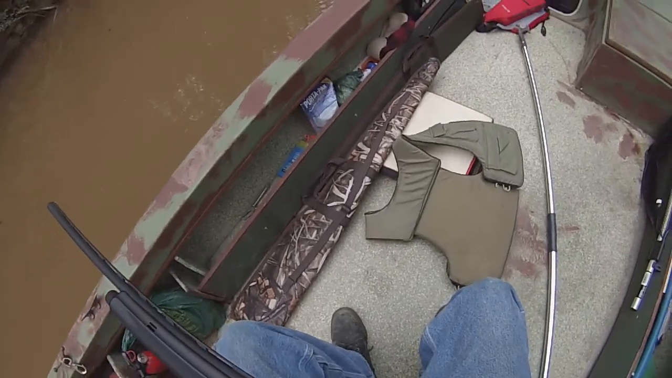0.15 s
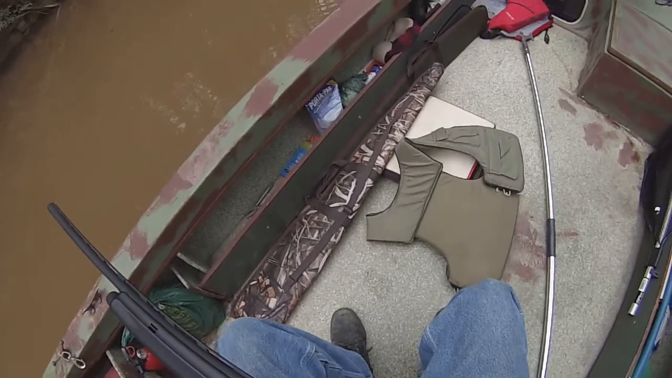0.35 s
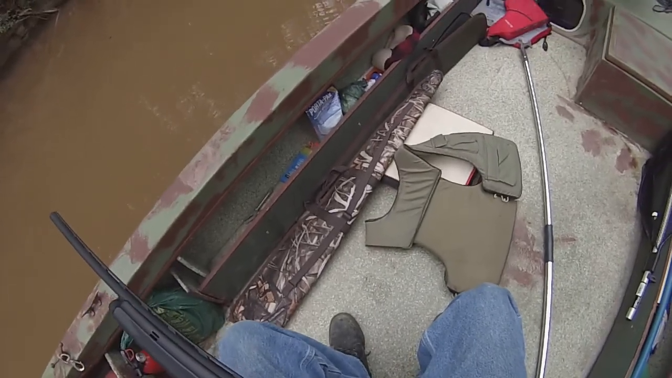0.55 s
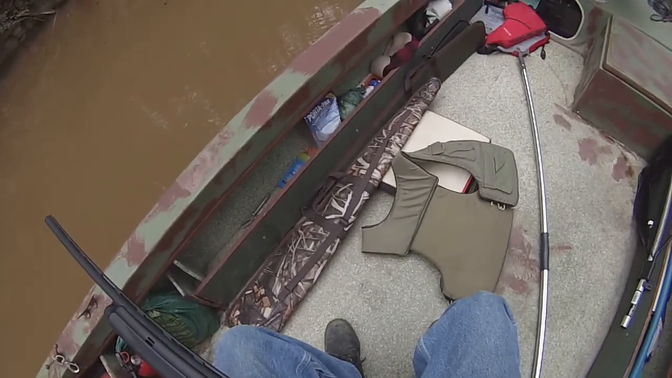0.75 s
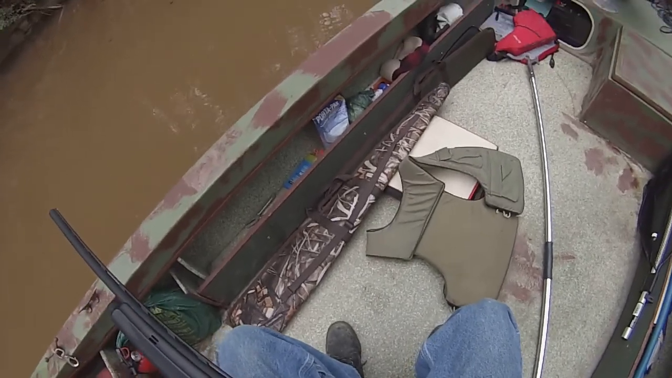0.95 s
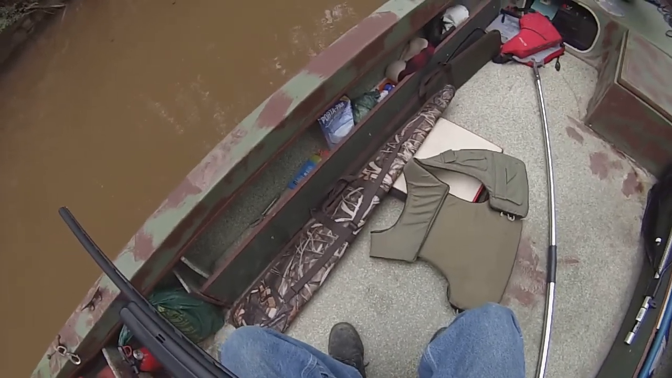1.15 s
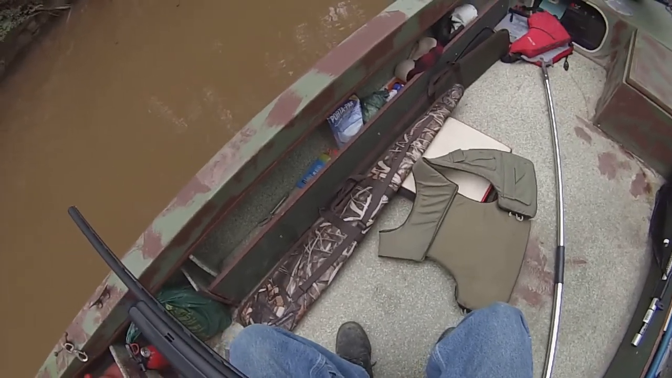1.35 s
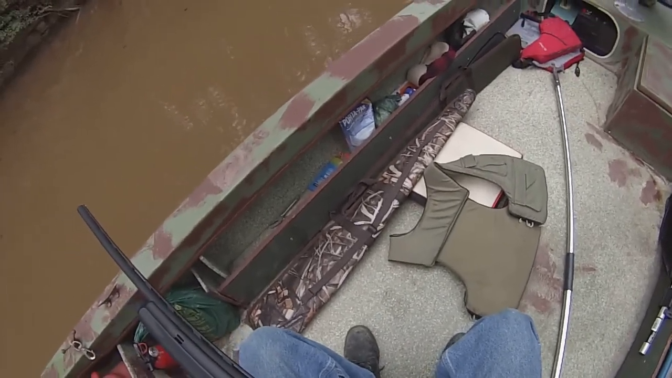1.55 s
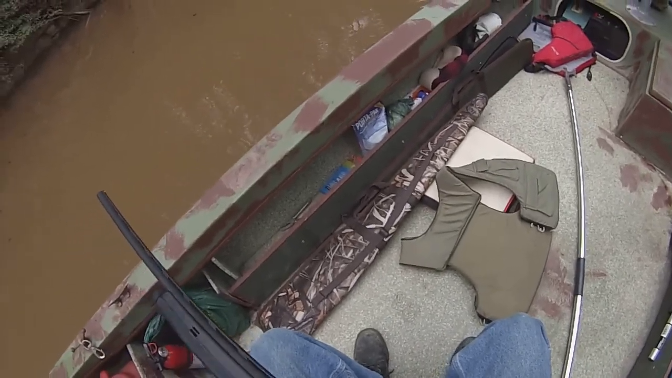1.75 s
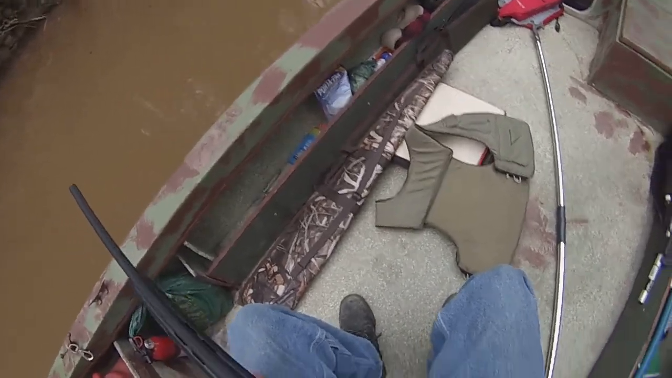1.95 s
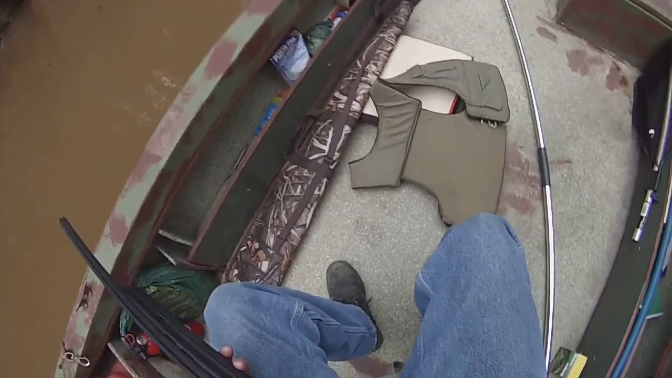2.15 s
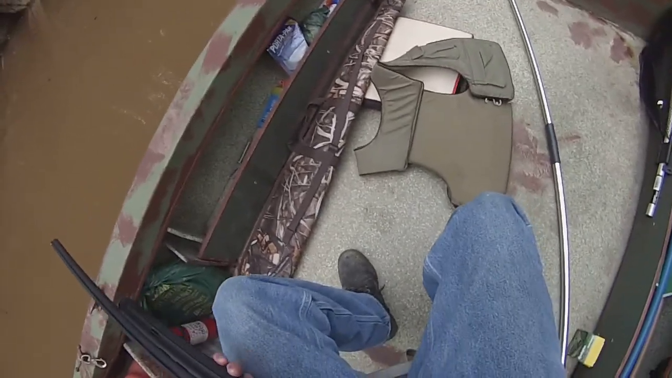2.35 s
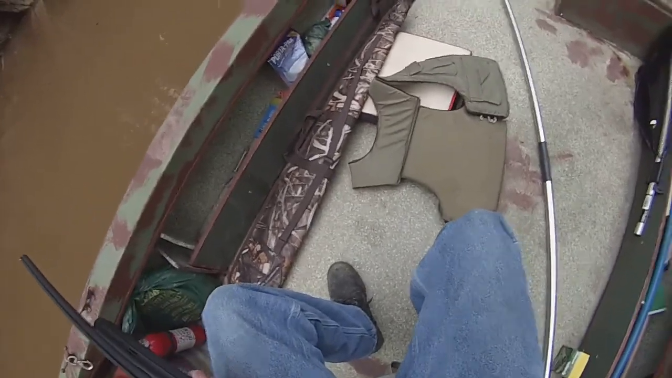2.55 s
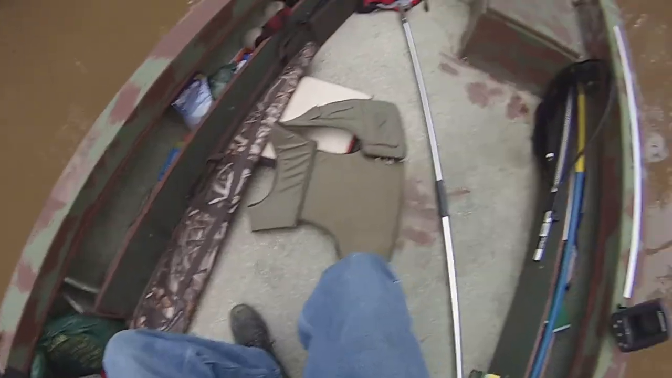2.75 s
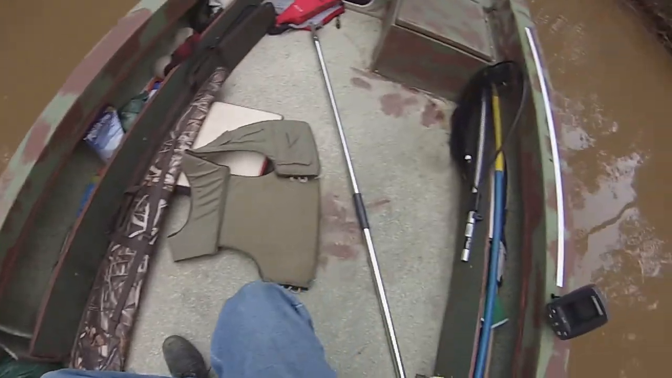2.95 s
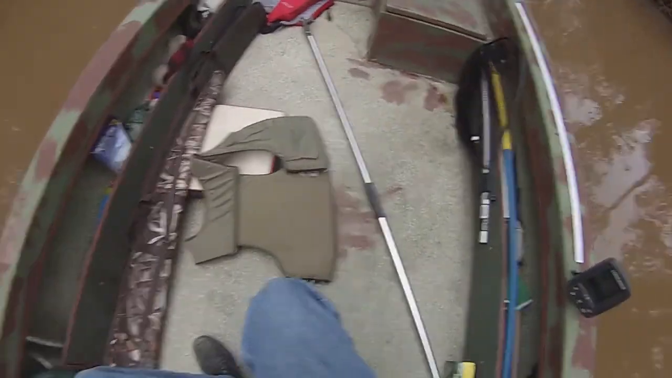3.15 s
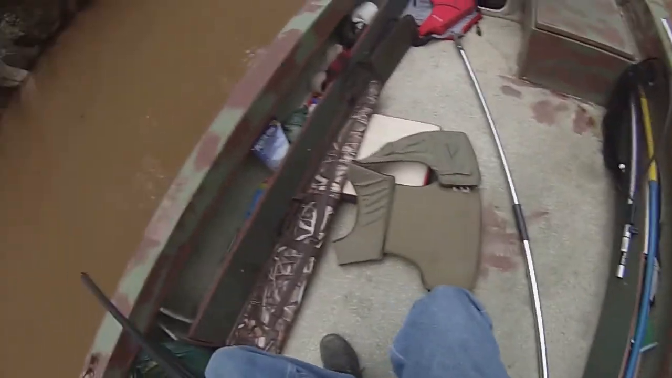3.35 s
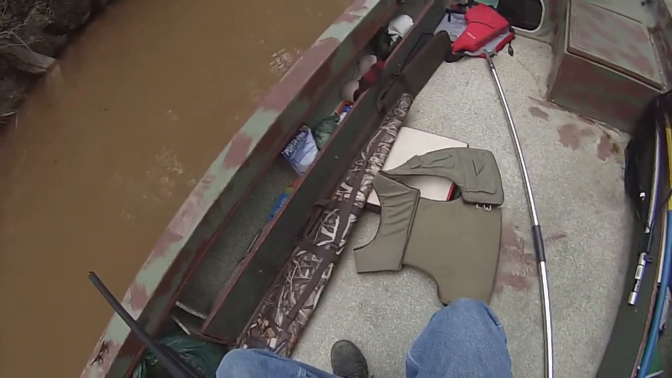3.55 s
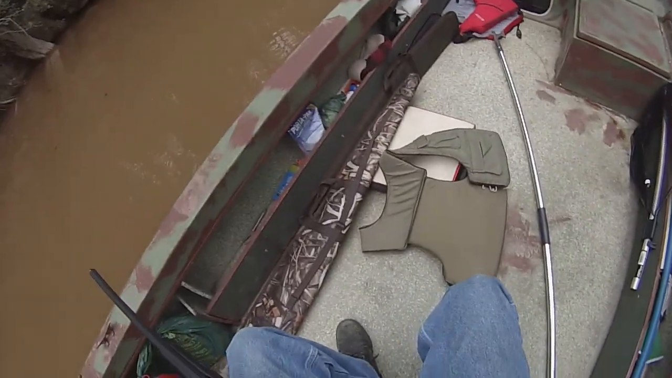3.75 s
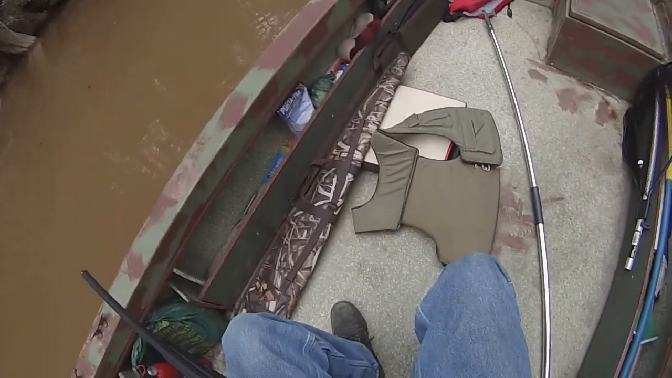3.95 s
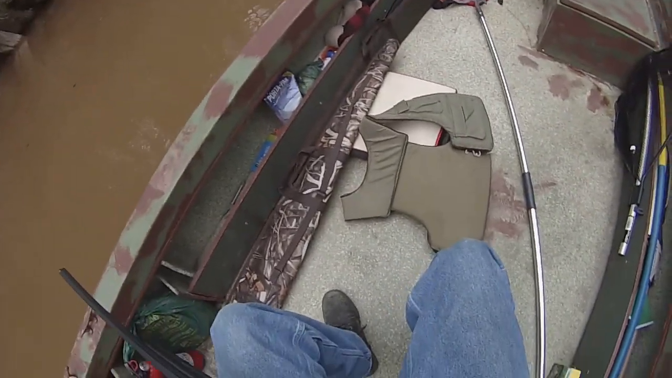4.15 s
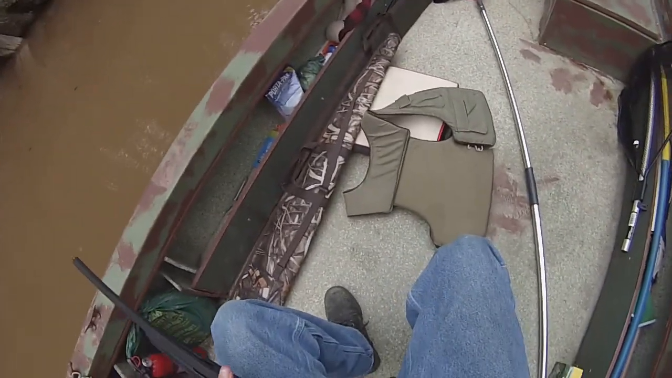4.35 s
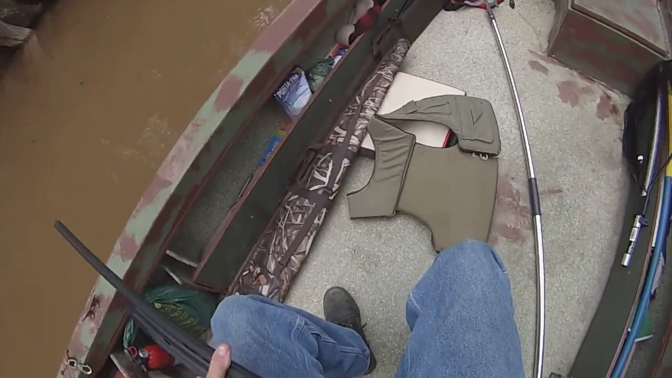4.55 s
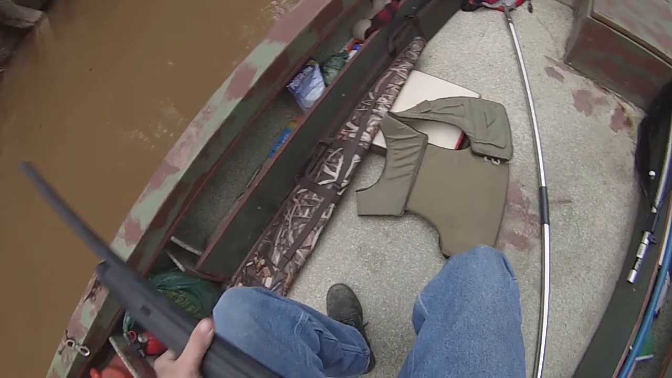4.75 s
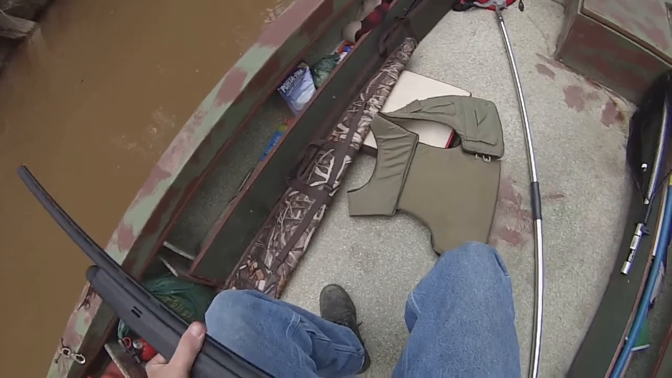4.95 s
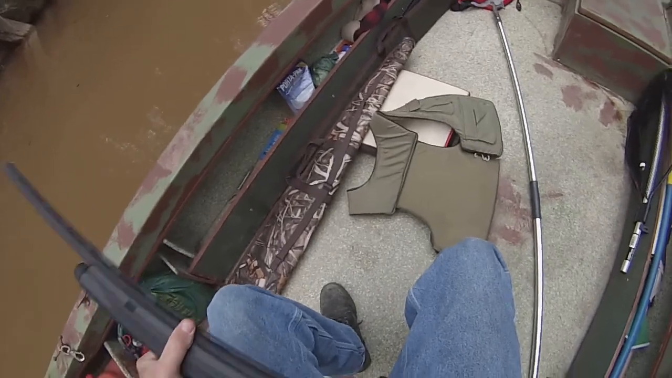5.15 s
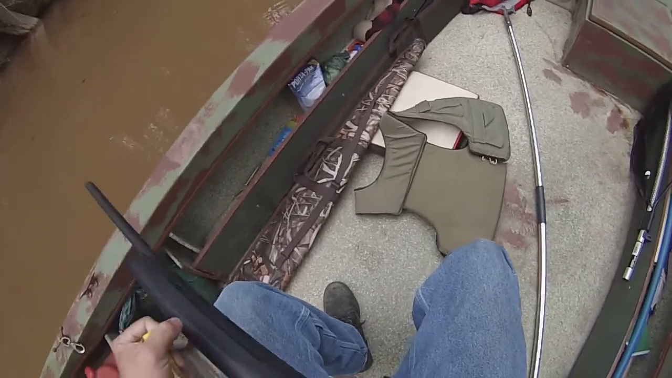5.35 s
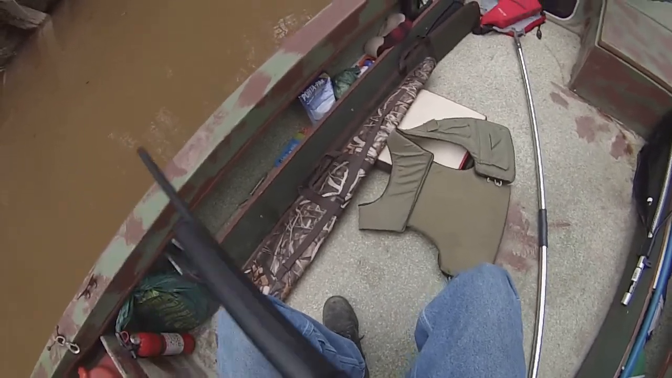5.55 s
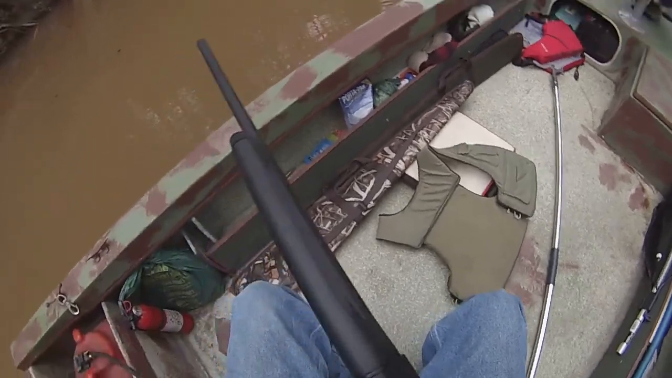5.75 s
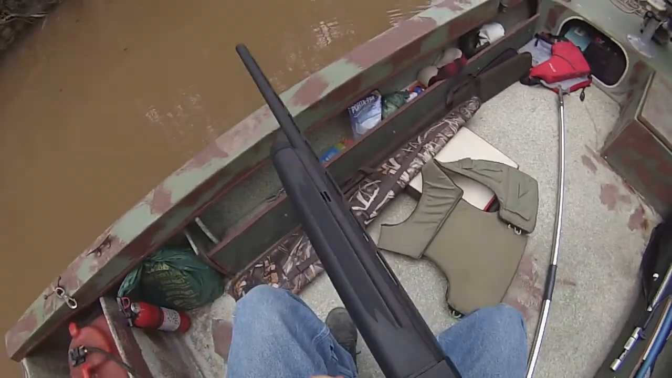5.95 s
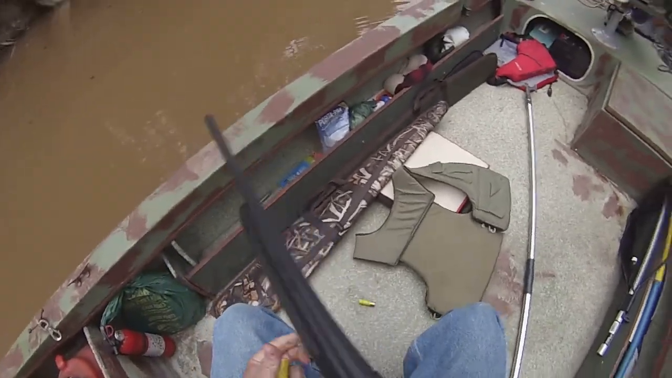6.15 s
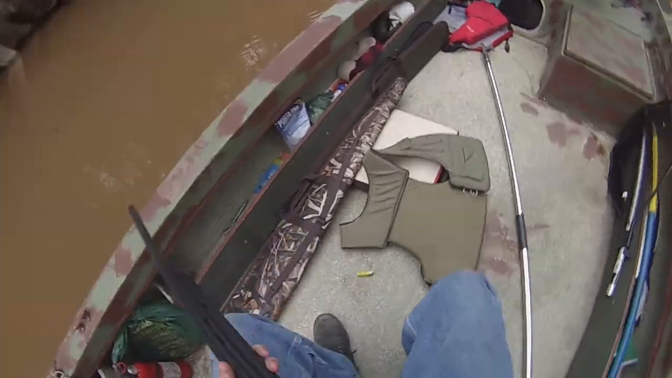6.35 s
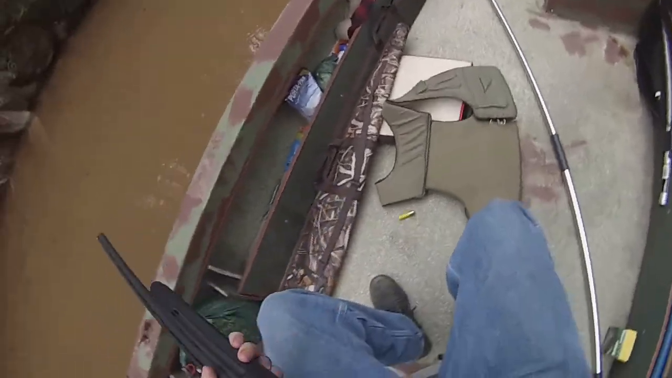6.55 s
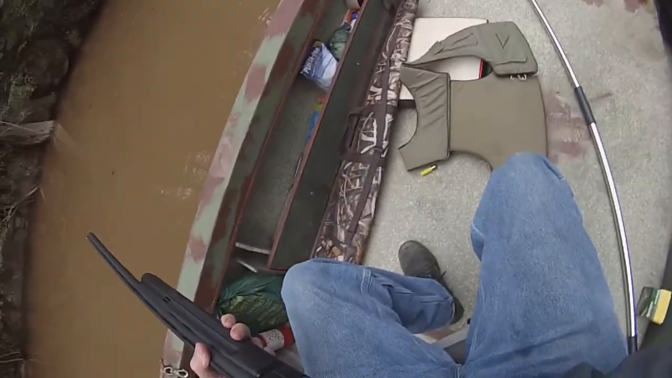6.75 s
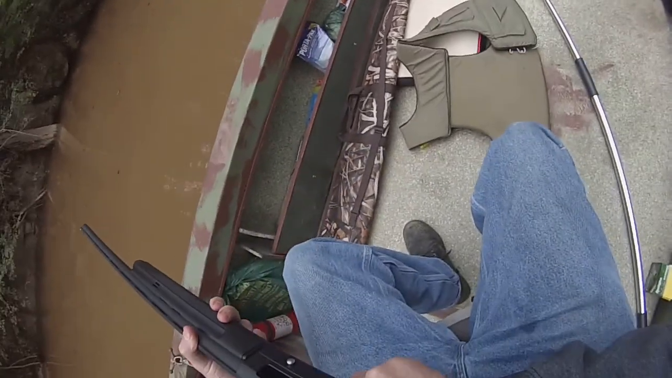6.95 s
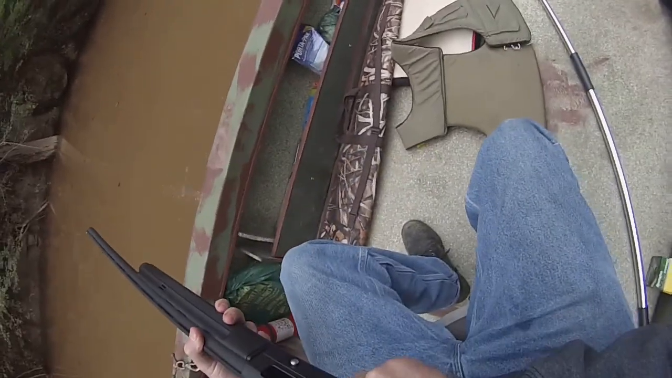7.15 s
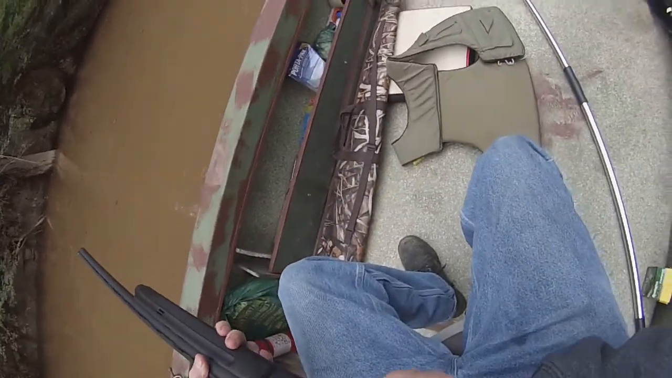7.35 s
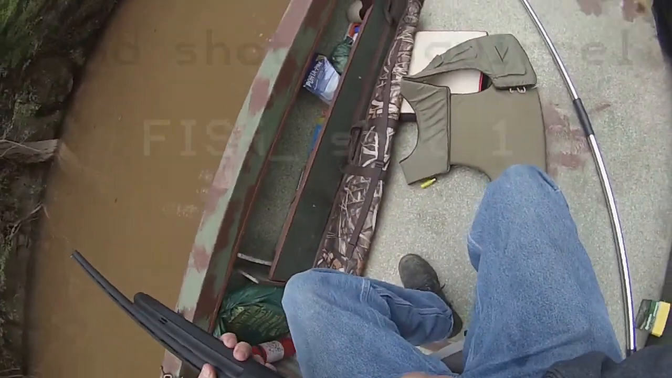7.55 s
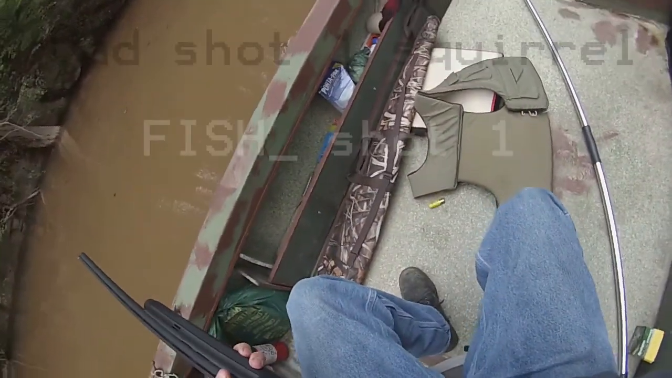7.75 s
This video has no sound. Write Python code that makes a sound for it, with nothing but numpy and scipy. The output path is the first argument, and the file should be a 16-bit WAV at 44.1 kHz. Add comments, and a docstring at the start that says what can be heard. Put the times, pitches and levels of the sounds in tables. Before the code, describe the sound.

Close to the microphone, a shotgun is handled in a small metal boat on a quiet river. Light steel ticks, sleeve rustles and dull bumps on the hull lead to the action being racked open and slammed shut with sharp clanks. More clicks follow as a shell is pushed in. Then a gunshot from some way off rings the hull and rolls along the wooded banks, and a shell knocks onto the deck.

```python
"""A shotgun is handled close by, in a small metal boat on a quiet river. Its steel parts tick and scrape,
the action (the loading mechanism) is racked open and slammed shut, and a shell is thumbed in.
Sleeves rustle, a palm rubs the stock and boots bump the hollow hull. Near 6 s a shot from some way off
rings the boat and rolls along the wooded banks, and a shell drops on the deck."""
import sys
import numpy as np
from scipy import signal
from scipy.fft import rfft, irfft
from scipy.io import wavfile
from scipy.ndimage import uniform_filter1d

SR = 44100
rng = np.random.default_rng(int(sys.argv[2]) if len(sys.argv) > 2 else 0)


def to_wav(s):
    """Save 16-bit WAV."""
    ch = np.atleast_2d(s).T  # columns
    pcm = np.round(np.clip(ch, -1, 1) * 32767)  # PCM
    wavfile.write(sys.argv[1], SR, pcm.astype(np.int16))


N = 347934
T = np.arange(N) / SR

# the tones at which the gun rings: pitch_hz, level_db, ring_s (time to fade by 60 dB)
GUN_TONES = [(570, -9.5, 0.044), (847, -3.5, 0.089), (959, -1.5, 0.03), (1250, -3.5, 0.018),
             (1697, 1.5, 0.073), (2000, -5, 0.027), (2440, 0, 0.068), (3150, -2, 0.027), (4700, -15, 0.057),
             (5490, 2.5, 0.028), (5970, -4.5, 0.028), (6540, -2, 0.026), (12300, -6.5, .04),
             (12870, 2.5, 0.046)]
# how low or bright steel on steel sounds: frequency_hz, level_db
STEEL_COLOUR = [(100, -18.5), (250, -4.5), (550, 3.5), (1200, 3.5), (2500, 5), (5400, -1), (7600, -5.5),
                (10500, -10.5), (15000, -15.5)]
# the shot and its separate echoes: start_s, level_db, dull_above_hz, thin_below_hz
SHOT_ARRIVALS = [(5.934, -13.5, 1463, 120), (5.9364, -6, 7500, 290), (5.938, -12.5, 1500, 260),
                 (5.9419, -25, 2530, 202), (5.9487, -17, 2000, 398), (6.0738, -17, 230, 235),
                 (6.1346, -17, 200, 235), (6.14, -17, 650, 235), (6.177, -27, 450, 230),
                 (7.057, -37, 498, 200)]


def gain(db):
    """Turn decibels into a number to multiply by."""
    return 10 ** (np.asarray(db) / 20)


def unit(x):
    """Scale to an average (rms) level of 1."""
    return x / np.sqrt(np.mean(x ** 2))


def fade(t, fade_s):
    """A level that falls by 60 dB in fade_s seconds."""
    return np.exp(-np.log(1000) * t / fade_s)


def punch(x):
    """Scale a blow to an average level of 1 over its first 8 ms."""
    return x / np.sqrt(np.mean(x[:int(.008 * SR)] ** 2))


def add(out, start_s, x):
    """Mix x into out from start_s on."""
    i = max(int(start_s * SR), 0)
    out[i:i + len(x)] += x[:N - i]


def band(x, hz, kind, order=2):
    """Keep the lows, the highs or a band in between."""
    sections = signal.butter(order, np.minimum(hz, SR / 2 - 1000), kind, fs=SR, output="sos")
    return signal.sosfilt(sections, x)


def colour(x, points, size=4096):
    """Shape bass and treble along a curve of (frequency_hz, level_db) points."""
    hz, db = np.transpose(points)
    grid_hz = np.maximum(np.fft.rfftfreq(size, 1 / SR), 1)
    curve_db = np.interp(np.log(grid_hz), np.log(hz), db)
    cepstrum = irfft(np.log(gain(curve_db)))
    # fold it so that the filter never sounds ahead of its input
    cepstrum[1:size // 2] *= 2
    cepstrum[size // 2 + 1:] = 0
    response = irfft(np.exp(rfft(cepstrum)))[:size // 2]
    return signal.fftconvolve(x, response)[:len(x)]


def ring(tones, t):
    """The fading tones of an object tapped once, with a total energy of 1."""
    y = sum(gain(db) / np.sqrt(ring_s) * fade(t, ring_s) * np.sin(2 * np.pi * hz * t)
            for hz, db, ring_s in tones)
    return y / np.linalg.norm(y)


def waver(spread_db, per_s):
    """A gain that drifts at random by about spread_db, turning per_s times a second."""
    hold = int(SR / per_s)
    steps = np.repeat(rng.standard_normal(N // hold + 1), hold)
    return gain(spread_db * unit(uniform_filter1d(steps, hold)[:N]))


def noise(points):
    """Steady noise of a given colour, at level 1."""
    return unit(colour(rng.standard_normal(N), points))


def strokes(moves, taper):
    """Level of movements that swell, hold and ease off; taper is the share spent on each slope."""
    level = np.zeros(N)
    for start_s, length_s, db in moves:
        inside_s = np.minimum(T - start_s, start_s + length_s - T)
        level += gain(db) * np.sin(np.pi / 2 * np.clip(inside_s / (taper * length_s), 0, 1))
    return level


def river_air(level_db=-57.5):
    """Quiet open air, gently wavering, with a faint far drone in it."""
    # still air over the river: frequency_hz, level_db
    air_colour = [(15, -34.5), (25, -0.5), (106, -4), (150, -12.5), (181, -3.5), (202, -9.5), (363, -15),
                  (450, -13.5), (529, -13), (621, -18.5), (811, -17.5), (978, -17.5), (1760, -24.5),
                  (2180, -23.5), (15000, -43)]
    # narrow bands of noise that make the drone: pitch_hz, width_hz, level_db
    drone_bands = [(107, 27, -67), (169, 10, -68.5), (536.8, 47, -69.5)]
    drone = np.zeros(N)
    for hz, width, db in drone_bands:
        hum = band(rng.standard_normal(N), [hz - width / 2, hz + width / 2], "band", order=1)
        drone += gain(db) * unit(hum)
    return gain(level_db) * noise(air_colour) * waver(2.03, per_s=3) + drone


def sleeves():
    """Sleeves rub unevenly as the arms move."""
    # arm movements: start_s, length_s, level_db
    arm_moves = [(0, 0.11, -66), (.55, 0.25, -63), (1.76, 0.81, -65.5), (2.55, 0.38, -69),
                 (3.65, 0.57, -60.5), (4.65, 1, -71), (5.66, 0.14, -62), (6.9, 1.3, -72)]
    # rubbing cloth: frequency_hz, level_db
    cloth_colour = [(200, -6.5), (800, 4.5), (3000, 0.5), (5500, -1), (9000, -11.5), (15000, -23)]
    return noise(cloth_colour) * strokes(arm_moves, taper=0.44) * waver(3, per_s=76)


def slides(catches_per_s=2500):
    """Sliding parts and fingers catch and slip, making a dense, uneven run of tiny clicks."""
    # sliding movements on the gun: start_s, length_s, level_db
    moves = [(0.026, 0.053, -57.5), (0.276, 0.029, -55), (0.571, 0.073, -52.5), (0.688, 0.031, -58.5),
             (0.975, 0.022, -46), (1.031, 0.075, -56), (2.05, 0.016, -47), (2.306, .006, -51),
             (2.544, .02, -40), (2.572, 0.034, -33.5), (2.63, 0.036, -46.5), (2.795, 0.024, -38),
             (3.845, 0.052, -38), (3.897, 0.036, -39), (4.349, 0.059, -40.5), (4.757, 0.036, -45.5),
             (4.818, 0.099, -60), (5.271, 0.04, -49)]
    catches = (rng.random(N) < catches_per_s / SR) * rng.choice([-1, 1], N)
    clicks = unit(catches * gain(5 * rng.standard_normal(N)))
    friction = clicks + gain(-3) * rng.standard_normal(N)
    gun_ring = signal.fftconvolve(friction, ring(GUN_TONES, T[:SR // 5]))[:N]
    scrape = unit(colour(friction + gain(-11) * gun_ring, STEEL_COLOUR))
    push = np.zeros(N)
    for start_s, length_s, db in moves:
        add(push, start_s, gain(db) * signal.windows.tukey(int(length_s * SR), .3))
    return push * band(scrape, 7000, "low", order=1)


def steel_hit(t, body_db, treble_db, part_hz, crack_s, rattle_db, rattle_s, gun_db, part_db, top_hz):
    """A hard crack rings the struck part and the whole gun, then rattles out."""
    crack = rng.standard_normal(len(t)) * fade(t, crack_s)
    rattle = rng.standard_normal(len(t)) * fade(t, rattle_s)
    part_ring = band(crack, [part_hz / 1.06, part_hz * 1.06], "band", order=1)
    # each blow lands on another spot, so the gun's tones come in a new balance
    tones = [(hz, db + 3 * rng.standard_normal(), ring_s) for hz, db, ring_s in GUN_TONES]
    gun_ring = signal.fftconvolve(crack, ring(tones, t))[:len(t)]
    hit = crack + gain(part_db) * part_ring + gain(gun_db) * gun_ring + gain(rattle_db) * rattle
    hit = colour(hit, STEEL_COLOUR)
    body = band(hit, 1200, "low", order=4)
    middle = band(hit, [1200, 4200], "band", order=3)
    treble = band(hit, 4200, "high", order=4)
    # softer parts stay in touch longer, which takes off the very top
    treble = band(treble, top_hz * gain(treble_db / 2), "low", order=1)
    return gain(body_db) * punch(body) + punch(middle) + gain(treble_db) * punch(treble)


def tick(t, part_hz, treble_db):
    """One light hit: the larger the part, the lower it sounds and the more it shakes the gun."""
    body_db = -6 - 7.5 * np.log2(part_hz / 2600)
    return steel_hit(t, body_db, treble_db, part_hz, crack_s=0.012, rattle_db=-8.5, rattle_s=0.061,
                     gun_db=-14.5, part_db=5.5, top_hz=14000)


def handling_ticks():
    """Fingers, shells and fittings tap lightly on steel."""
    # light taps: start_s, level_db, treble_db, pitch_hz
    taps = [(0.0317, -52, -9, 1420), (0.095, -45, -7, 2620), (0.2351, -46, 6, 5100),
            (0.4943, -47, 2.5, 3160), (0.5933, -41.5, 3, 2000), (0.5993, -35.5, -6, 2630),
            (0.6291, -50.5, 4.5, 2650), (0.7623, -47.5, -0.5, 3500), (0.8034, -45.5, 2, 2680),
            (0.9841, -43.5, -8, 2970), (1.0505, -40.5, 4, 3000), (1.1649, -50, 2.5, 4100),
            (1.3037, -42.5, -3.5, 5000), (1.3099, -47, -6, 4630), (1.4, -38, -5.5, 2820),
            (1.8353, -47.5, -12.5, 1410), (2.0653, -45, -5, 2980), (2.1503, -48, -7, 2350),
            (2.3136, -36.5, -4.5, 2410), (4.1748, -44.5, 2, 4200), (4.7297, -43, -11.5, 1260),
            (4.7731, -41.5, -3, 2000), (4.8152, -42.5, -10, 2480), (4.8247, -42.5, -7, 3020),
            (4.8454, -41, -14, 2110), (4.873, -43.5, -4.5, 2610), (4.9823, -49, -9, 2450),
            (5, -43.5, -5.5, 1310), (5.0504, -43, -13.5, 2950), (5.3085, -44, -10, 1600),
            (5.3266, -35, 0, 3380), (5.354, -39, -4, 2330), (5.361, -45, 7.5, 3200),
            (5.4164, -38, 3.5, 3800), (5.428, -50, -2, 3960), (5.47, -49.5, -1.5, 4000),
            (5.501, -51, -3, 2360), (5.507, -46, -3, 2350), (6.074, -42, -8, 2600), (6.1405, -34, -8, 2600),
            (6.18, -45, -14, 1300), (6.206, -44, -9, 1302), (6.233, -57, -10, 2020), (6.32, -43, -8, 1590),
            (6.5411, -51, -12, 1950), (6.7213, -46.5, -18, 2365), (6.8489, -54, -9, 1600),
            (6.93, -55.5, -20, 2400)]
    out, t = np.zeros(N), T[:SR // 9]
    for start_s, db, treble_db, part_hz in taps:
        add(out, start_s, gain(db) * tick(t, part_hz, treble_db))
    return out


def knocks(rise_s=0.00062, middle_hz=824):
    """A soft bump rings one hollow tone, with a dull thud around it."""
    # bumps on stock, deck and hull: start_s, level_db, pitch_hz
    bumps = [(.295, -46.5, 522), (1.066, -39, 660), (1.078, -35.5, 82.4), (1.097, -33, 733),
             (1.133, -40, 89), (1.262, -39, 609), (1.271, -44.5, 121), (1.419, -37.5, 212),
             (1.421, -40, 86.5), (1.464, -43, 810), (1.471, -42, 150), (1.505, -45, 120), (1.69, -48, 835),
             (1.858, -44, 740), (2.15, -26, 1090), (2.153, -30.5, 775), (2.235, -43.5, 470),
             (2.369, -44.5, 910), (2.8165, -14, 930), (2.8295, -29.5, 627), (2.8557, -36.5, 245),
             (3.045, -49, 451), (3.25, -56, 419), (3.94, -26.5, 395), (4.007, -39, 570),
             (4.383, -26.5, 906), (4.784, -28, 862), (4.959, -32, 904), (5.3095, -22, 900),
             (5.355, -29.5, 940), (5.572, -31, 498), (5.631, -39.5, 564), (6.32, -15.5, 922)]
    out, t = np.zeros(N), T[:SR // 3]
    for start_s, db, hz in bumps:
        # big, low panels ring longer and less purely than the stock
        ring_s = .04 * (hz / middle_hz) ** -0.5
        thud_db = -7 - 3.5 * np.log2(hz / middle_hz)
        thud = unit(band(rng.standard_normal(len(t)), [hz / 2, hz * 1.4], "band"))
        level = gain(db) * (1 - np.exp(-t / rise_s)) * fade(t, ring_s)
        add(out, start_s, level * (np.sin(2 * np.pi * hz * t) + gain(thud_db) * thud))
    return out


def gun_action(spring_db=-24):
    """The loading mechanism strikes steel on steel, and every blow shakes its spring."""
    # heavy blows: start_s, level_db, body_db, treble_db, pitch_hz
    blows = [(2.5649, -27.5, -0.5, 1, 1710), (2.5704, -28, -15, 2.5, 3320), (2.58, -38, -9.5, 10, 2110),
             (2.594, -32, -7.5, 6, 5250), (2.5976, -43, -4.5, 18, 5360), (2.6061, -36.5, -6.5, 2, 5250),
             (2.6375, -43, -14, -8, 2540), (2.6425, -36.5, -14, -3, 2630), (2.8162, -22, -5.5, -10, 2500),
             (2.8304, -25.5, 2, -9, 2470), (2.8546, -17, -11, -3.5, 1300), (2.8827, -29.5, -4, -12, 1500),
             (3.7998, -34.5, -10, 0.5, 9900), (3.8475, -41.5, 5, 4.5, 2460),
             (3.8659, -30.5, -17.5, 2.5, 5200), (3.871, -45, -6, 11.5, 5470),
             (3.9018, -26, -7.5, -5.5, 1920), (3.9362, -31, -0.5, 8, 5200), (3.94, -21.5, -2, 9.5, 5450),
             (3.9425, -24, -10, -7.5, 1600), (3.9506, -34, -6, 4.5, 5430), (3.9961, -42, -1, -4, 2140),
             (4.3631, -36.5, -2.5, -1.5, 1350), (4.3835, -27.5, -11, -6, 1955)]
    # the tones of the spring: pitch_hz, level_db, ring_s
    spring_tones = [(9535, -2, .07), (9670, -1, .03), (10400, -3, .025), (11300, -9, .11), (12600, -9, .03)]
    # the spring twangs as the latch lets go and as the bolt slams home: start_s, level_db
    twangs = [(3.8, -39), (3.94, -22)]
    out, t = np.zeros(N), T[:SR // 9]
    spring = punch(ring(spring_tones, t))
    for start_s, db, body_db, treble_db, part_hz in blows:
        blow = steel_hit(t, body_db, treble_db, part_hz, crack_s=.022, rattle_db=-11, rattle_s=0.08,
                         gun_db=-11.5, part_db=8.5, top_hz=16540)
        add(out, start_s, gain(db) * (blow + gain(spring_db) * spring))
    for start_s, db in twangs:
        add(out, start_s, gain(db) * spring)
    return out


def loose_fittings(gap_s=.035, middle_hz=2100, spread_octaves=0.36, spread_db=2):
    """Loose fittings chatter as the grip shifts: faint ticks of random timing, strength and pitch."""
    # shifts of the grip: start_s, length_s, level_db
    grip_shifts = [(4.699, .09, -53), (4.86, .03, -47), (4.94, .06, -48), (5.059, .03, -53.5),
                   (5.161, .06, -55.5), (5.435, .06, -54)]
    out, t = np.zeros(N), T[:SR // 12]
    for start_s, length_s, db in grip_shifts:
        for slot_s in np.arange(start_s, start_s + length_s, gap_s):
            strength, pitch = rng.standard_normal(2)
            tick_s = slot_s + gap_s * rng.random()
            part_hz = middle_hz * 2 ** (spread_octaves * pitch)
            add(out, tick_s, gain(db + spread_db * strength) * tick(t, part_hz, treble_db=-11))
    return out


def palm_rub(stock_hz=920):
    """Skin drags on the stock, sounding its hollow tone under a gritty scrape."""
    # strokes of the palm: start_s, length_s, level_db
    rubs = [(4.7, 0.23, -55.5), (4.92, 0.34, -64), (5.24, 0.14, -53)]
    hollow = unit(band(rng.standard_normal(N), [stock_hz / 1.16, stock_hz * 0.97], "band", order=1))
    grit = unit(band(rng.standard_normal(N), [700, 2500], "band") * waver(7, per_s=300))
    return (hollow + gain(-4) * grit) * strokes(rubs, taper=0.26) * waver(4, per_s=67)


def shot(wave_s=0.0022, scatter_s=0.048):
    """Each arrival is a pressure wave that rings the hull and scatters among the things on board."""
    # the scattered blast: frequency_hz, level_db
    blast_colour = [(40, -37.5), (110, 7.5), (250, -0.5), (400, 1.5), (750, 5), (1200, -7), (1800, -4.5),
                    (2600, -10.5), (5000, -13.5), (9000, -29), (15000, -28)]
    # the tones of the metal hull: pitch_hz, level_db, ring_s
    hull_tones = [(145.5, -16.5, .2), (215, -14.5, .12), (266, -1.5, 0.19), (389, 7, 0.072),
                  (434, -5, 0.14), (557, -15.5, 0.098), (706, -6, 0.05), (722, -8.5, 0.18), (860, 0, 0.12),
                  (1054, -3, 0.051), (1308, -9.5, 0.056), (1625, -6, .045), (2060, -15, .05)]
    out, t = np.zeros(N), T[:SR // 3]
    wave = (1 - 2 * t / wave_s) * (t < wave_s)  # shaped like the letter N
    wave = band(wave, 7000, "low", order=1)  # the air softens its edges
    hull = ring(hull_tones, t)
    for start_s, db, dull_hz, thin_hz in SHOT_ARRIVALS:
        scatter = colour(rng.standard_normal(len(t)) * fade(t, scatter_s), blast_colour)
        blast = wave / np.linalg.norm(wave) + gain(1) * scatter / np.linalg.norm(scatter) + hull
        # small surfaces send back no bass, rough or far ones no treble
        blast = band(blast, thin_hz, "high")
        blast = band(blast, dull_hz, "low", order=1)
        add(out, start_s, gain(db) * punch(blast))
    return out


def swell(start_s, length_s, rise_s, sag_db_per_s, fade_s):
    """Level of an echo: it builds up, sags while more trees answer, then dies away."""
    age_s = np.maximum(T - start_s, 0)
    rise = 1 - np.exp(-age_s / rise_s)
    sag = gain(-sag_db_per_s * np.minimum(age_s, length_s))
    return rise * sag * fade(np.maximum(age_s - length_s, 0), fade_s)


def rolling_echo():
    """Countless tree trunks send the shot back; the far ones return mostly its low part."""
    # stretches of woodland that answer: start_s, length_s, rumble_db, crackle_db
    woods = [(6.121, 0.51, -30.5, -48), (7.425, .6, -50, -78)]
    # the low part of the echo: frequency_hz, level_db
    rumble_colour = [(80, -24.5), (150, -15.5), (215, 4), (260, 1.5), (320, -5.5), (410, -0.5),
                     (540, -13.5), (750, -15.5), (1100, -28.5), (2000, -69)]
    # the high part of the echo: frequency_hz, level_db
    crackle_colour = [(400, -15.5), (900, 7), (1300, -1), (2000, -5.5), (3500, -15), (6000, -26),
                      (12000, -48.5)]
    rumble_power, crackle_power = np.zeros(N), np.zeros(N)
    # trees right beside the boat add a short tail to each arrival
    for start_s, db, _, _ in SHOT_ARRIVALS:
        tail = gain(db) * swell(start_s, length_s=0, rise_s=0.0098, sag_db_per_s=0, fade_s=0.31)
        rumble_power += (gain(-16) * tail) ** 2
        crackle_power += (gain(-30.5) * tail) ** 2
    # the longer the way, the more slowly an echo builds up and sags
    for start_s, length_s, rumble_db, crackle_db in woods:
        delay_s = start_s - SHOT_ARRIVALS[0][0]
        echo = swell(start_s, length_s, rise_s=0.11 * delay_s, sag_db_per_s=2.7 / delay_s, fade_s=1.41)
        rumble_power += (gain(rumble_db) * echo) ** 2
        crackle_power += (gain(crackle_db) * echo) ** 2
    rumble = noise(rumble_colour) * np.sqrt(rumble_power) * waver(1, per_s=50)
    crackle = noise(crackle_colour) * np.sqrt(crackle_power) * waver(4, per_s=120)
    return rumble + crackle


def with_hull_and_banks(near, boom_db=-24, boom_s=0.14, tail_db=-29, tail_s=0.73):
    """Near sounds boom briefly in the hull; bushes on the banks scatter them into a faint hiss."""
    # what the banks send back: frequency_hz, level_db
    bank_colour = [(150, -10), (400, 4), (700, -1), (1500, 2), (3000, 2), (5500, -0.5), (8000, -11.5),
                   (11000, -12), (15000, -22)]
    t = T[:SR]
    decay = fade(t, tail_s) ** 2 * (t > .012)
    tail_power = np.maximum(signal.fftconvolve(near ** 2, decay / decay.sum())[:N], 0)
    hull = band(rng.standard_normal(SR), [180, 700], "band") * fade(t, boom_s)
    boom = signal.fftconvolve(near, hull / np.linalg.norm(hull))[:N]
    return near + gain(boom_db) * boom + gain(tail_db) * np.sqrt(tail_power) * noise(bank_colour)


def scene():
    """Mix everything heard from the boat into one channel."""
    around = palm_rub() + sleeves() + shot() + rolling_echo() + river_air()
    handling = gun_action() + handling_ticks() + slides() + knocks() + loose_fittings()
    return (around + with_hull_and_banks(handling))[None]


def record(dry):
    """Round off the loudest peaks and cut the treble above 15400 Hz."""
    treble_cut = signal.ellip(8, .2, 80, 15400, fs=SR, output="sos")
    return signal.sosfilt(treble_cut, np.tanh(dry))


dry = scene()
out = record(dry)
to_wav(out)
```